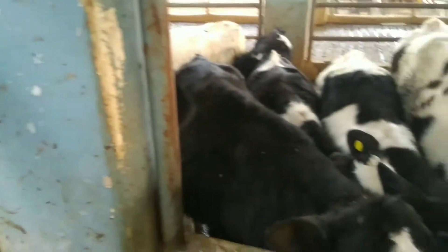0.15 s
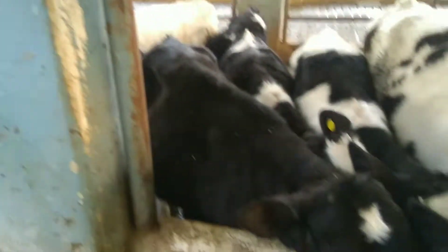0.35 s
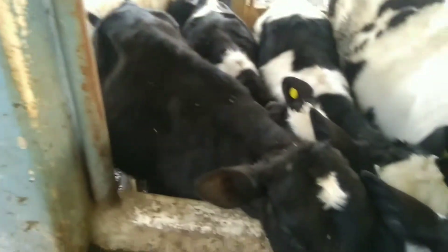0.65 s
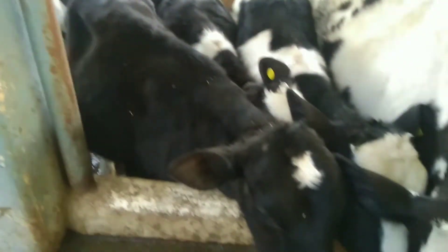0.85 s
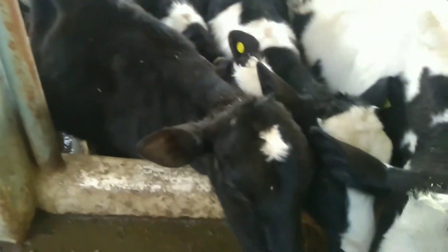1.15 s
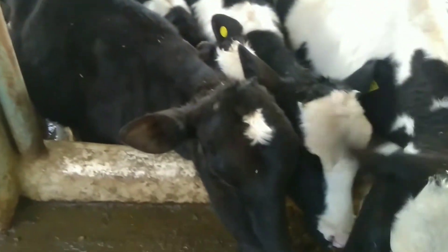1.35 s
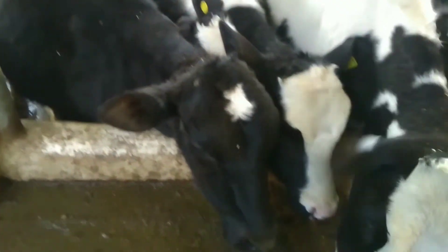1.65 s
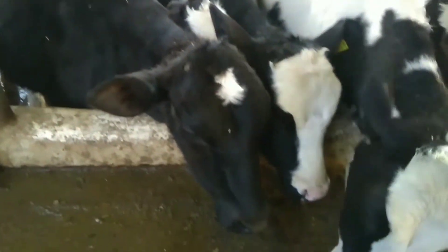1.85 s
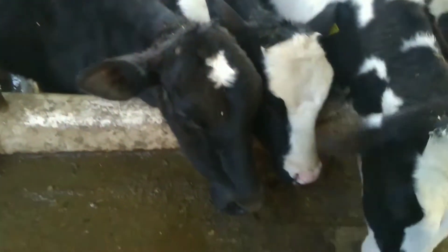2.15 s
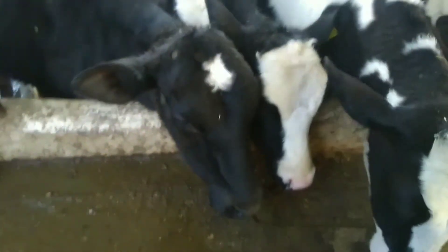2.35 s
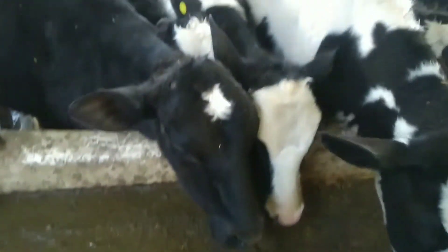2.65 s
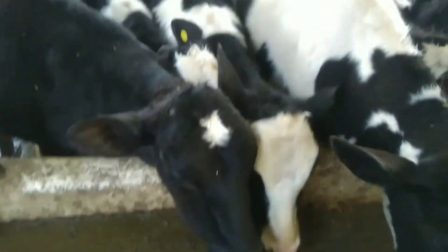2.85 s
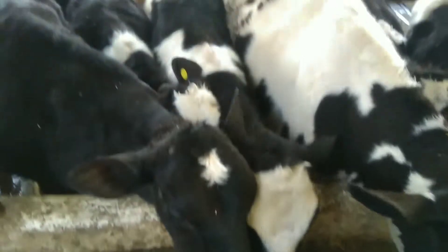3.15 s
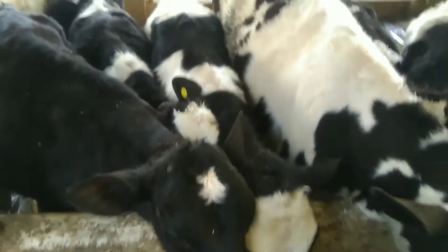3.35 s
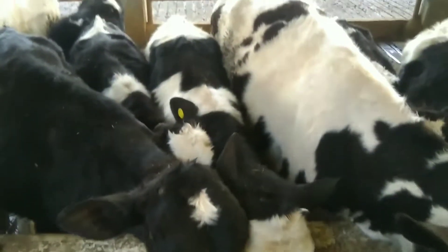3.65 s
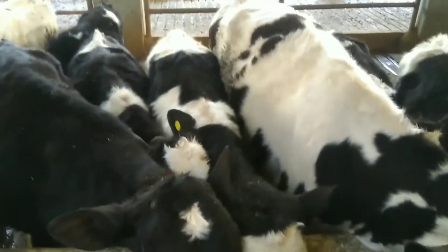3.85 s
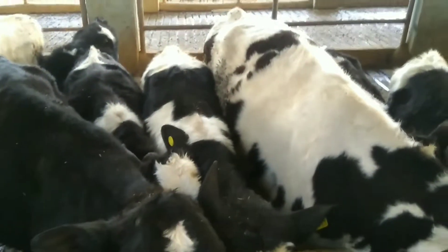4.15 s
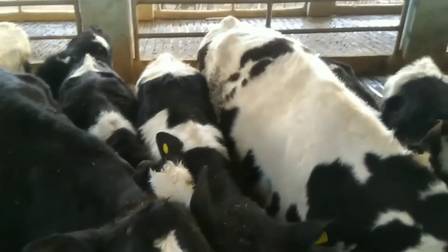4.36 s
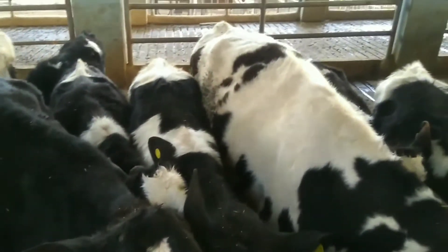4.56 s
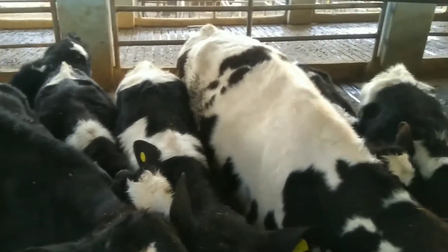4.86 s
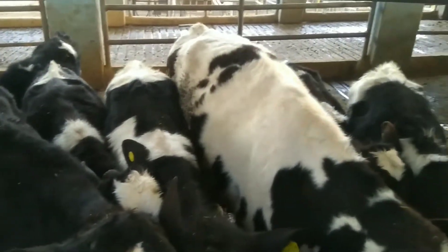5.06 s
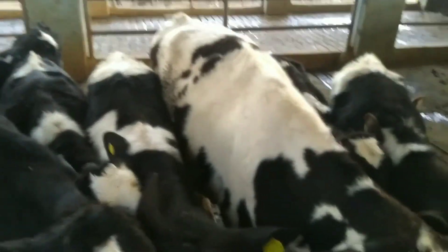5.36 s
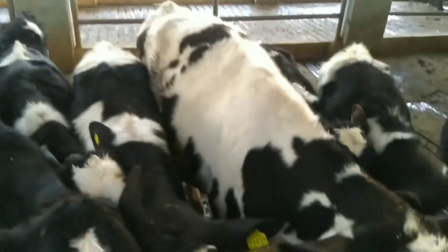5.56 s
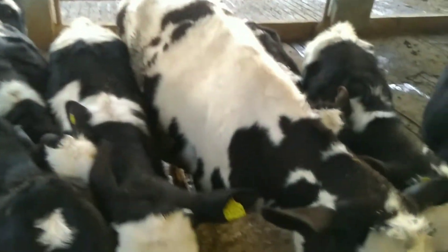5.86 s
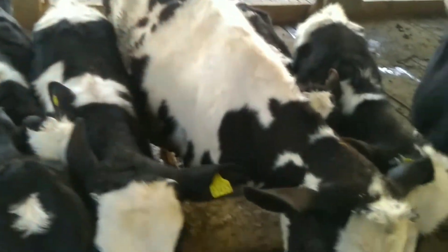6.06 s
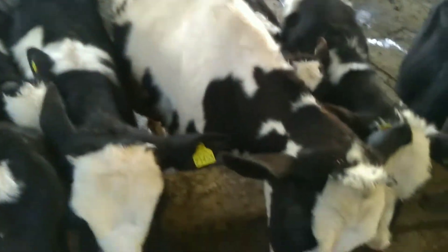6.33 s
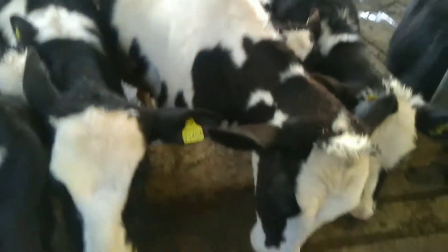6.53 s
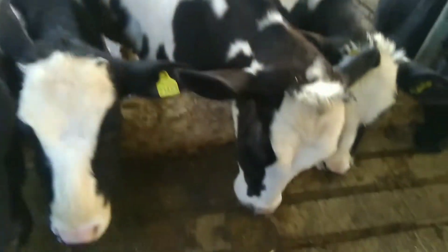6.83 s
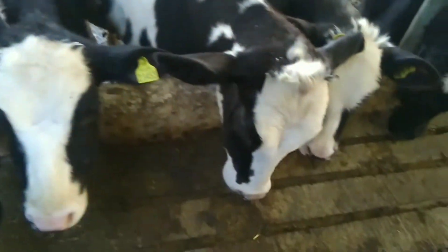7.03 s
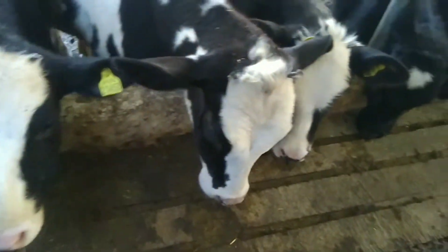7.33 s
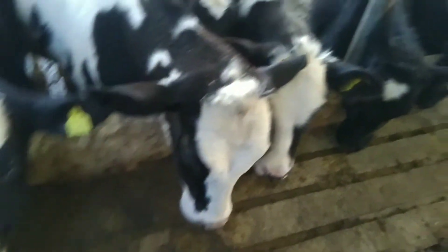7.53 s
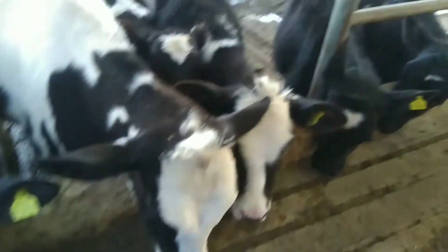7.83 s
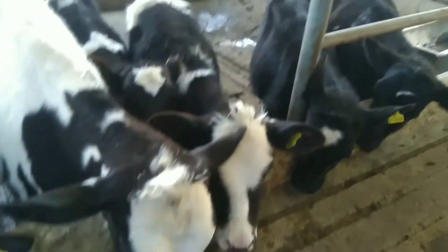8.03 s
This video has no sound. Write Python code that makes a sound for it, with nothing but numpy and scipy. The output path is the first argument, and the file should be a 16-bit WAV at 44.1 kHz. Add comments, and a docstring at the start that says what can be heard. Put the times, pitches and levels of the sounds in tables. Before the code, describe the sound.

A calf's long, loud, throaty moo rings through an echoing cattle shed, then a roof bird's repeated rising whistles and faint small-bird cheeps follow.

```python
"""Calf mooing in an echoing cattle shed

One calf moos long and loud: harmonics of its vocal folds filtered by the throat, plus pulsed breath noise.
Towards its end a bird in the roof starts repeating a rising whistle, a gliding hoarse tone; later small birds
cheep in short glides around a thin band of narrow noise. A motor whines faintly over a low hum, a trough is
knocked, far calves and pips sound as brief tones, and filtered noise makes rustles, shed air and rumble.
The recorder turns loud calls down, suppresses what is near the background and is mono below the treble."""
import sys
import numpy as np
from scipy import signal
from scipy.fft import rfft, irfft, next_fast_len
from scipy.io import wavfile
from scipy.ndimage import uniform_filter1d

SR = 44100
rng = np.random.default_rng(int(sys.argv[2]) if len(sys.argv) > 2 else 0)


def generate_wav(signal):
    """Clip the signal to [-1, 1] and save it as 16-bit WAV at the path in sys.argv[1]."""
    frames = np.transpose(np.atleast_2d(signal))
    scaled = np.clip(frames, -1, 1) * 32767
    pcm = np.round(scaled).astype(np.int16)
    wavfile.write(sys.argv[1], SR, pcm)


N = 361179
LEAD = SR   # samples of run-in, so that the shed is already ringing at 0 s
TIME = (np.arange(N + LEAD) - LEAD) / SR
# All source levels below hold ahead of the shed, where a source passes through it, and of the recorder.


def from_db(db):
    """Decibel law: 20 dB is a factor of ten in amplitude."""
    return 10 ** (np.asarray(db) / 20)


def rms_one(x):
    """Normalization to unit effective value."""
    return x / np.sqrt(np.mean(x ** 2) + 1e-20)


def in_time(rows):
    """Linear interpolation of each column of a table along the time axis."""
    s, *columns = np.transpose(rows)
    return [np.interp(TIME, s, c) for c in columns]


def at_hz(points, hz):
    """Interpolation of a spectrum on a logarithmic frequency axis."""
    point_hz, values = np.array(points).T
    return np.interp(np.log(np.maximum(hz, 1)), np.log(point_hz), values)


def drift(rate):
    """Slow random fluctuation: noise through a double one-pole low-pass at rate [Hz], rms 1."""
    r = np.exp(-2 * np.pi * rate / SR)
    return rms_one(signal.lfilter([1], [1, -2 * r, r * r], rng.standard_normal(len(TIME))))


def coloured(spectrum):
    """Spectral shaping: white noise weighted by the given spectrum, rms 1."""
    size = next_fast_len(len(TIME))
    hz = np.arange(size // 2 + 1) * SR / size
    shaped = rfft(rng.standard_normal(size)) * from_db(at_hz(spectrum, hz))
    return rms_one(irfft(shaped, size)[:len(TIME)])


def glides(rows, bend, edge):
    """Frequency modulation: sine glides, fastest at the start if bend < 1; edge is the share spent fading."""
    out = np.zeros(len(TIME))
    for s, length, from_hz, to_hz, level_db in rows:
        i = LEAD + round(s * SR)
        share = np.linspace(0, 1, round(length * SR))
        pitch = from_hz + (to_hz - from_hz) * share ** bend
        tone = np.sin(2 * np.pi * np.cumsum(pitch) / SR)
        tone *= np.sqrt(2) * from_db(level_db) * signal.windows.tukey(len(share), np.clip(edge, 0, 1))
        out[i:i + len(tone)] += tone[:max(len(out) - i, 0)]
    return out


# Reverberation time of the shed: (frequency [Hz], decay time by 60 dB [s])
SHED_DECAY = [(200, 1), (400, 1.264), (600, 1.3), (900, 1.2), (1300, 1), (2000, 1.28), (2700, 1.1),
              (3500, 2.2), (5000, 0.52), (8000, 0.95)]


def shed(x, direct_db, wet_db, dull_db=0):
    """Diffuse reverberation: half-octave noise bands decay exponentially, losing dull_db/octave above 1 kHz."""
    t, tail = np.arange(2 * SR) / SR, 0
    for low in 90 * 2. ** np.arange(0, 7.6, .5):
        edges = [low, min(np.sqrt(2) * low, .45 * SR)]
        band = signal.butter(2, edges, "band", fs=SR, output="sos")
        loss_db = dull_db * max(np.log2(low / 1000), 0)
        decay = from_db(-60 * t / at_hz(SHED_DECAY, 1.08 * low) - loss_db)
        tail = tail + signal.sosfilt(band, rng.standard_normal(len(t))) * decay
    tail *= np.clip((t - .008) / 0.017, 0, 1)   # the first walls answer after a few metres
    tail *= from_db(wet_db) / np.sqrt(np.sum(tail ** 2))
    tail[0] += from_db(direct_db)
    return signal.fftconvolve(x, tail)[:len(x)]


# Spectrum of the steady shed noise: (frequency [Hz], relative density [dB per Hz])
AIR_SPECTRUM = [(90, -41.5), (150, -18), (200, -8), (340, -9.5), (580, -8.5), (820, -14), (1310, -9),
                (2400, -15), (3800, -13), (4500, -24.5), (5000, -22), (5600, -31), (9000, -35),
                (15500, -42.5)]
AIR_DB = -55.5


def shed_air():
    """Stationary broadband noise: a fixed spectrum whose level fluctuates only slightly."""
    return from_db(AIR_DB + .6 * drift(2.3)) * coloured(AIR_SPECTRUM)


HUM_HZ, HUM_DB = 191, -71


def hum():
    """Joint frequency and amplitude modulation: a low tone wavers slowly in pitch and level."""
    phase = 2 * np.pi * np.cumsum(HUM_HZ + 7 * drift(3.6)) / SR
    return np.sqrt(2) * from_db(HUM_DB + 1.9 * drift(5)) * np.sin(phase)


# Slow level of the air rumble: (time [s], level [dB])
RUMBLE_LEVEL = [(0, -32), (.7, -39.5), (1.2, -38.5), (2.0, -32), (2.3, -44.5), (2.5, -64), (3.1, -60),
                (3.9, -51.5), (4.8, -59), (5.8, -64.5), (7.5, -66), (8.19, -47)]
# Spectrum of the rumble and its puffs: (frequency [Hz], relative density [dB per Hz])
RUMBLE_SPECTRUM = [(12, -52.5), (20, -27.5), (32, -24.5), (59, -3.5), (82, 5), (140, -14.5), (195, -10.5),
                   (300, -38.5), (390, -68), (660, -120)]
# Puffs of air on the microphone: (end of the rise [s], nominal peak level [dB])
AIR_PUFFS = [(2.438, -40), (3.198, -41), (3.407, -40), (3.623, -33.5), (3.79, -49), (3.957, -42),
             (4.208, -75), (4.453, -33.5), (4.622, -53), (4.762, -46), (5.089, -39), (5.38, -33.5),
             (5.985, -43), (6.158, -35), (6.292, -53.5), (6.72, -40), (7.65, -40.5), (7.837, -38)]
PUFF_RISE_S, PUFF_T60_S = 0.016, 0.79
PUFF_CREST_DB = 12.5   # nominal peak above rms


def rumble():
    """Turbulent pressure at the microphone: low noise on a slow level, with fast-rising, decaying puffs."""
    level = from_db(in_time(RUMBLE_LEVEL)[0] + 1.4 * drift(5))
    for s, peak_db in AIR_PUFFS:
        after = np.maximum(TIME - s + PUFF_RISE_S, 0)
        decay = from_db(peak_db - PUFF_CREST_DB - 60 * after / PUFF_T60_S)
        level = level + decay * np.clip(after / PUFF_RISE_S, 0, 1)
    return level * coloured(RUMBLE_SPECTRUM)


# Clearest rustles of hide and straw:
# (time [s], length [s], centre frequency [Hz], width [octaves], rms level before the fade window [dB])
CLEAR_RUSTLES = [(2.798, 0.14, 5840, 0.92, -65), (3.118, .08, 10430, 1.3, -57.5),
                 (4.88, 0.034, 6890, 0.75, -63.5), (5.029, .12, 9910, .92, -62.5),
                 (5.648, .092, 8480, 0.26, -62), (6.36, 0.04, 8420, .18, -67.5),
                 (6.634, .17, 7750, .68, -65), (7.832, .12, 9960, 0.36, -60.5),
                 (8.036, .033, 6496, 0.55, -62.5)]
FAINT_RUSTLES_PER_S, FAINT_RUSTLE_DB = 4, -76   # mean rate and typical level of random small ones


def rustles():
    """Friction noise: short bursts of grainy noise pass through a band filter."""
    out = np.zeros(len(TIME))
    starts = MOO_END_S + np.cumsum(rng.exponential(1, 40)) / FAINT_RUSTLES_PER_S
    draw = rng.standard_normal((40, 3))
    small = [(s, 0.11 * np.exp(.4 * a), 8000 * np.exp(0.19 * b), .6, FAINT_RUSTLE_DB + 2.5 * c)
             for s, (a, b, c) in zip(starts, draw) if s < N / SR - .2]
    for s, length, hz, width, level_db in list(CLEAR_RUSTLES) + small:
        i, size = LEAD + round(s * SR), min(round(length * SR), SR // 5)
        edges = [hz / 2 ** (width / 2), min(hz * 2 ** (width / 2), .45 * SR)]
        band = signal.butter(2, edges, "band", fs=SR, output="sos")
        grains = rng.standard_normal(8820) * from_db(2.5 * rng.standard_normal(8820))
        burst = rms_one(signal.sosfilt(band, grains[:size]))
        out[i:i + size] += from_db(level_db) * burst * np.hanning(size)
    return out


# Blows on the trough: (time [s], reference level [dB])
KNOCK_TIMES = [(6.206, -32.5)]
# Its modes: (frequency [Hz], level against the reference, before decay [dB], decay time by 60 dB [s])
TROUGH_MODES = [(620, -8.5, 0.035), (855, -2.5, 0.0553), (1167, -5.5, 0.025)]


def knock():
    """Modal vibration: a dull blow excites damped resonances of the trough."""
    t, out = np.arange(SR // 5) / SR, np.zeros(len(TIME))
    onset = np.clip(t / 0.0038, 0, 1)
    for s, peak_db in KNOCK_TIMES:
        i = LEAD + round(s * SR)
        for hz, level_db, t60 in TROUGH_MODES:
            decay = from_db(peak_db + level_db - 60 * t / t60)
            out[i:i + len(t)] += decay * np.sin(2 * np.pi * hz * t) * onset
    return out


# Strongest partials of calves far away or humming with closed mouth:
# (time [s], length [s], start pitch [Hz], level [dB])
FAR_PARTIALS = [(2.72, 0.2, 655, -50), (2.74, 0.28, 575, -50), (2.71, .07, 510, -55), (2.84, .09, 850, -60),
                (3.09, .09, 460, -62), (3.17, .08, 660, -60), (3.7, .18, 580, -60), (3.58, 0.33, 680, -58),
                (3.56, 0.14, 430, -58), (4.529, 0.07, 655, -55), (4.797, .05, 652, -57.5),
                (4.853, 0.2, 574, -50.5), (4.992, 0.102, 602, -52.5), (4.951, 0.18, 474, -42.5),
                (5.125, 0.1, 463, -50.5), (8.058, 0.29, 101.56, -38.5), (8.075, 0.17, 205, -62)]
FAR_SAG_PER_S = .17   # share of the pitch lost per second of length


def far_calves():
    """Proportional glide: every partial sags by the same share of its pitch per second of length."""
    rows = [(s, length, hz, hz * (1 - FAR_SAG_PER_S * length), level_db)
            for s, length, hz, level_db in FAR_PARTIALS]
    return glides(rows, bend=.71, edge=.45)


# Clearest short faint tones: (time [s], length [s], pitch [Hz], level [dB])
CLEAR_PIPS = [(2.545, 0.17, 1493, -46), (2.801, 0.1, 1653, -50.5), (2.845, .07, 1954, -58),
              (2.912, 0.1, 1315, -49.5), (3.002, 0.2, 1448, -54.5), (3.23, .14, 1481, -53.5),
              (3.98, .05, 910, -61.5), (5.8, .1, 3905, -71), (5.789, .05, 3555, -66),
              (5.994, 0.083, 3718, -67.5), (6.198, .045, 5220, -72.5), (6.275, 0.071, 4196, -70),
              (6.506, .06, 3960, -69.5), (7.282, .07, 4297, -75.5), (7.48, .3, 3690, -68),
              (7.68, .09, 5160, -76.5), (8.077, 0.07, 5057, -71), (3.32, .08, 4567, -54),
              (3.395, 0.14, 5023, -54.5), (3.446, 0.22, 5155, -62.5), (3.585, .2, 4970, -61.5),
              (2.465, 0.035, 5470, -64.5), (3.169, 0.12, 5090, -78.5), (3.955, .1, 5130, -69),
              (5.347, 0.11, 5113, -67), (4.035, .23, 4042, -55.5), (4.091, .07, 1362, -57),
              (4.757, 0.1, 1675, -53.5), (5.982, 0.056, 1236, -65.5), (6.623, 0.036, 1470, -57),
              (6.639, .074, 3930, -66.5), (6.738, 0.12, 5040, -68), (7.277, 0.053, 1660, -64),
              (7.238, 0.13, 5005, -75.5), (7.469, 0.16, 5027, -73.5), (7.496, .13, 5150, -71.5),
              (6.49, 0.05, 5100, -65.5), (7.46, 0.057, 1537, -56.5), (7.693, 0.15, 5920, -66),
              (7.851, 0.078, 2080, -62.5), (7.908, 0.067, 1447, -57.5), (8.075, 0.15, 3420, -52.5)]
PIP_BEND = 0.0069   # typical share of its pitch by which a clear pip departs at either end
PIP_FLUTTER_HZ = 70   # rate of the level flutter, which smears the pitch
# fainter ones come at random, near two pitches
FAINT_PIPS_PER_S, FAINT_PIP_HZ, FAINT_PIP_DB, FAINT_PIP_S = 1, (4100, 5150), -80, .07


def pips():
    """Sideband broadening: short sliding tones, tabled or by chance, are smeared by fast level flutter."""
    slides = PIP_BEND * rng.standard_normal(len(CLEAR_PIPS))
    rows = [(s, length, hz * (1 - slide), hz * (1 + slide), level_db)
            for (s, length, hz, level_db), slide in zip(CLEAR_PIPS, slides)]
    starts = MOO_END_S + np.cumsum(rng.exponential(1, 60)) / FAINT_PIPS_PER_S
    draw = rng.standard_normal((60, 3))
    for k, s in enumerate(starts[starts < N / SR]):
        hz = FAINT_PIP_HZ[k % 2] * (1 + 0.042 * draw[k, 0])
        length = FAINT_PIP_S * np.exp(0.13 * draw[k, 1])
        rows.append((s, length, hz, .99 * hz, FAINT_PIP_DB + 3 * draw[k, 2]))
    return glides(rows, bend=0.52, edge=0.47) * (1 + .6 * drift(PIP_FLUTTER_HZ))


# Level of the thin whistling band: (time [s], level [dB])
THIN_LEVEL = [(5.2, -93.5), (5.6, -61), (6.05, -55.5), (6.25, -61), (6.63, -52.5), (6.75, -59.5),
              (6.9, -51.5), (7.2, -65.5), (8.19, -62)]
THIN_HZ, THIN_WIDTH_HZ, THIN_WANDER_HZ = 3283, 90, 35   # centre, width, rms slow wandering of the pitch


def thin_band():
    """Quadrature modulation: slow noise on a wandering tone spreads it into a faint fluttering band."""
    phase = 2 * np.pi * np.cumsum(THIN_HZ + THIN_WANDER_HZ * drift(1.4)) / SR
    lowpass = signal.butter(4, THIN_WIDTH_HZ / 2, fs=SR, output="sos")
    smear = signal.sosfilt(lowpass, rng.standard_normal((2, len(TIME))))
    band = smear[0] * np.sin(phase) + smear[1] * np.cos(phase)
    return from_db(in_time(THIN_LEVEL)[0]) * rms_one(band)


# Swells of the low tone of the motor: (middle [s], length [s], level at the peak [dB])
WHINE_SWELLS = [(2.522, 0.59, -49.5), (3.123, 0.66, -48), (3.646, 0.34, -46), (4.031, 0.28, -60),
                (4.292, .22, -55), (4.538, 0.15, -56), (4.832, 0.12, -58), (5.042, .2, -59.5),
                (5.278, 0.11, -53)]
WHINE_HZ = 1820
OCTAVE_DB, OCTAVE_SWELL_DB = -52.5, 4   # mean level and swing either way
OCTAVE_EVERY_S, OCTAVE_LATE_S = .345, 0.33   # pulse period, first aligned peak after the first whistle starts
OCTAVE_SPAN_S = (1.5, 5.5)


def whine():
    """Harmonic motor tone: an unsteady fundamental in swells, its octave pulsing about once a whistle."""
    low = 0
    for s, length, peak_db in WHINE_SWELLS:
        low = low + from_db(peak_db) * np.cos(np.pi * np.clip((TIME - s) / length, -.5, .5))
    beat = np.cos(2 * np.pi * (TIME - RISING_WHISTLES[0][0] - OCTAVE_LATE_S) / OCTAVE_EVERY_S)
    sounding = (TIME > OCTAVE_SPAN_S[0]) * (TIME < OCTAVE_SPAN_S[1])
    high = from_db(OCTAVE_DB + OCTAVE_SWELL_DB * beat) * sounding
    phase = 2 * np.pi * np.cumsum(WHINE_HZ + 16 * drift(20)) / SR
    return np.sqrt(2) * (low * np.sin(phase) + high * np.sin(2 * phase))


# Course of the small birds: (time [s], centre pitch [Hz], reference level of the cheeps [dB])
FLOCK_COURSE = [(6.8, 3190, -75), (6.9, 3120, -41), (6.96, 3130, -53.5), (7.15, 3375, -54),
                (7.28, 3120, -53), (7.4, 3330, -53.5), (7.53, 3284, -52), (7.78, 3300, -50.5),
                (8.19, 3330, -55)]
LOW_START_DB = -9.5   # cheeps that start lower, against the reference level


def flock(per_s=60, spread_hz=90):
    """Random superposition: many short rising cheeps; every third starts lower and glides further."""
    centre, level_db = in_time(FLOCK_COURSE)
    draw = rng.standard_normal((400, 2))
    starts = FLOCK_COURSE[0][0] + np.cumsum(rng.exponential(1, 400)) / per_s
    rows = []
    for k, s in enumerate(starts[starts < N / SR - .01]):
        i = LEAD + round(s * SR)
        hz = centre[i] + spread_hz * np.clip(draw[k, 0], -1.5, 1.5)
        chance_db = 4 * draw[k, 1]
        if k % 3:
            rows.append((s, .04, hz - 60, hz + 60, level_db[i] - 4 + chance_db))
        else:
            rows.append((s, .06, hz - 130, hz + 180, level_db[i] + LOW_START_DB + chance_db))
    return glides(rows, bend=0.94, edge=0.49)


# Rising whistles of the roof bird: (time [s], start pitch [Hz], level before roughening and filters [dB])
RISING_WHISTLES = [(1.84, 2068, -41.5), (2.185, 2027, -42), (2.539, 2117, -40.5), (2.875, 2045, -40.5),
                   (3.225, 2164, -39.5), (3.564, 2051, -40), (3.903, 2096, -42), (4.262, 2127, -40.5),
                   (4.6, 2120, -41), (4.939, 2114, -41), (5.289, 2097, -43)]
WHISTLE_S, WHISTLE_TO_HZ, WHISTLE_WEAK_BELOW_HZ = .25, 3950, 2200


def whistles():
    """Filtered glide: noise modulation makes a rising tone breathy, and filters weaken its two ends."""
    rows = [(s, WHISTLE_S, hz, WHISTLE_TO_HZ, level_db) for s, hz, level_db in RISING_WHISTLES]
    hoarse = glides(rows, bend=.95, edge=.22) * (.7 + .6 * drift(120)) * from_db(1.8 * drift(30))
    hoarse = signal.sosfilt(signal.butter(4, WHISTLE_WEAK_BELOW_HZ, "high", fs=SR, output="sos"), hoarse)
    # a gentle low-pass favours the early, lower part
    hoarse = 1.9 * signal.sosfilt(signal.butter(1, 1800, fs=SR, output="sos"), hoarse)
    return signal.sosfilt(signal.cheby2(6, 14, 3800, fs=SR, output="sos"), hoarse)


# Throat resonances of the moo, already under way at 0 s:
# (time [s], then the level of each of four resonance groups from low to high [dB])
MOO_LEVELS = [(-.4, -48, -54.5, -45.5, -61), (-.15, -25, -37, -23, -29), (0.0, -20, -24, -18.5, -23.5),
              (0.04, -21.5, -28, -20.5, -28.5), (0.36, -24.5, -19, -17.5, -22),
              (0.38, -33.5, -19, -15.5, -25), (0.47, -15, -26, -15, -24), (0.54, -16, -26.5, -26.5, -34),
              (0.63, -20.5, -25, -14, -22), (0.66, -21.5, -19, -20, -25), (0.7, -14, -24, -22, -28),
              (0.76, -17, -20.5, -18, -25.5), (0.86, -14, -22, -21, -26.5), (1.06, -19, -19, -16, -24.5),
              (1.25, -14, -26, -19.5, -26.5), (1.33, -24, -20.5, -12.5, -24), (1.58, -19, -20, -18, -28.5),
              (1.63, -22.5, -19.5, -17.5, -27.5), (1.85, -21, -29, -22.5, -29.5),
              (2.0, -24.5, -26.5, -29.5, -35.5), (2.1, -27, -34, -35, -40.5)]
# Rate of the vocal folds, smoothed over 50 ms when played: (time [s], pitch [Hz])
FOLD_PITCH = [(-.4, 92), (-.15, 103.5), (0, 111), (.17, 119), (.32, 124.8), (.41, 128.1), (.51, 131.4),
              (.61, 134.9), (.7, 137.6), (.8, 138.9), (.91, 139.3), (1.06, 138.8), (1.24, 137.4),
              (1.4, 135.5), (1.54, 132.3), (1.63, 128.6), (1.77, 120.6), (1.87, 112.5), (2.0, 97),
              (2.1, 86)]
# Unevenness of the folds: (time [s], roughness [0-1], strong-weak alternation of pulses [0-1])
FOLD_ROUGHNESS = [(0, .03, 0), (.6, .02, 0), (.65, .3, .3), (.69, .015, 0), (1.3, .02, 0), (1.5, .04, .05),
                  (1.6, .2, .35), (1.9, .3, .3), (2.1, .6, .3)]
# Mouth: (time [s], resonances as a share of their tabled pitch [1], sharpness of the resonances [1])
MOUTH_SHAPE = [(-.4, 0.69, 0.8), (0, 1, 0.86), (.3, 1.0, 0.79), (.6, 0.98, 1.0), (1.2, 1.002, 1.0),
               (1.6, 1.062, 0.69), (1.85, .99, 1), (2.1, 0.88, 0.62)]
# Throat filter: (frequency [Hz], gain at full sharpness [dB])
THROAT_FILTER = [(140, -36), (270, -5.5), (410, 7.5), (560, -8.5), (720, -18), (840, -12), (970, 7),
                 (1200, -16), (1520, -1.5), (1680, -6), (1830, -1.5), (2150, -14.5), (2400, -6),
                 (2800, -17.5), (3050, -19), (3300, -19.5), (3500, -23.5), (3630, -12), (3780, -29.5),
                 (3950, -34.5), (4150, -25.5), (4400, -48.5), (4600, -30.5), (4900, -50.5), (6500, -45)]
# Spectrum of the breath noise: (frequency [Hz], relative density [dB per Hz])
BREATH_SPECTRUM = [(300, -20), (900, -9), (1600, -3.5), (2500, -10.5), (3600, -20.5), (4300, -13.5),
                   (5000, -17), (6200, -16.5), (8200, -24), (8800, -30.5), (11000, -30.5), (12500, -37.5),
                   (14000, -31.5), (15500, -34)]
# Valleys between the four resonance groups: (frequency [Hz])
GROUP_EDGES_HZ = [720, 1220, 2170]
STILL_ABOVE_HZ = 3400   # resonances up here stay put while the mouth moves
MOO_END_S, BREATH_END_S = 2.003, 2.146   # the breath outlasts the voice
BREATH_DB = -15   # against the level of the highest resonance group
SPREAD_RAD = .22   # the throat rings on: phase lag per square root of harmonic number
WAVER_DB = .17   # level waver per harmonic number, up to the 20th


def moo():
    """Source-filter principle: fold harmonics are weighted by the throat, with breath puffed once a cycle."""
    levels_db = in_time(MOO_LEVELS)
    pitch = uniform_filter1d(in_time(FOLD_PITCH)[0], size=SR // 20)
    rough, uneven = in_time(FOLD_ROUGHNESS)
    mouth, sharp = in_time(MOUTH_SHAPE)
    # uneven folds shake the pitch
    phase = 2 * np.pi * np.cumsum(pitch * (1 + .03 * rough * drift(40))) / SR
    used = TIME < MOO_END_S
    groups = np.zeros((4, used.sum()))
    wavers = [drift(3)[used] for _ in range(9)]   # shared in turn by the harmonics
    lags = SPREAD_RAD * rng.standard_normal(52)
    at = np.arange(used.sum())
    for k in range(1, 52):
        hz = k * pitch[used]
        throat_hz = np.where(hz < STILL_ABOVE_HZ, hz / mouth[used], hz)
        gain_db = sharp[used] * at_hz(THROAT_FILTER, throat_hz) + WAVER_DB * min(k, 20) * wavers[k % 9]
        lag = np.sqrt(k) * (lags[k] + .12 * wavers[(k + 5) % 9])
        harmonic = from_db(gain_db) * np.cos(k * phase[used] + lag)
        groups[np.searchsorted(GROUP_EDGES_HZ, hz), at] += harmonic
    # each group is brought to an even level before the table sets its strength
    groups /= np.sqrt(uniform_filter1d(groups ** 2, size=4500, axis=1) + 1e-9)
    voice = np.zeros(len(TIME))
    voice[used] = np.sum(from_db(levels_db)[:, used] * groups, axis=0)
    voice *= from_db(5 * rough * drift(60)) * (1 + uneven * np.cos(phase / 2))
    breath = from_db(BREATH_DB + levels_db[-1]) * coloured(BREATH_SPECTRUM) * (1 + .35 * np.cos(phase))
    voice *= np.clip((MOO_END_S - TIME) / 0.067, 0, 1)
    return voice + breath * np.clip((BREATH_END_S - TIME) / .15, 0, 1)


def scene():
    """Linear superposition: direct and reverberant sources add to one pressure, given to both channels."""
    air, low_air, low_tone = shed_air(), rumble(), hum()
    far = shed(far_calves() * (1 + .7 * drift(60)), direct_db=-2, wet_db=-14)
    faint = shed((pips() + whine()) * (1 + 0.3 * drift(30)), direct_db=-0.5, wet_db=-9)
    birds = shed(whistles() + flock(per_s=70, spread_hz=110), direct_db=-6, wet_db=-.5)
    calf = shed(moo(), direct_db=8.0, wet_db=-2.5, dull_db=2.5)
    mono = air + low_air + low_tone + rustles() + knock() + far + faint + thin_band() + birds + calf
    return np.array([mono, mono])[:, LEAD:]


def gain_control(x, knee_db=-26, share=0.43, release_db_s=45):
    """Dynamic compression: a share of the excess is removed; steady release then lifts the shed's tail."""
    level_db = 10 * np.log10(uniform_filter1d(x ** 2, size=1500) + 1e-12)
    ramp = release_db_s * np.arange(N) / SR
    held_db = np.maximum.accumulate(level_db + ramp) - ramp   # peaks held, falling at the release rate
    excess_db = uniform_filter1d(np.maximum(held_db - knee_db, 0), size=1500)
    return x * from_db(-share * excess_db)


def suppress(x, margin_db=5, depth_db=-10, memory_db=-15):
    """Spectral subtraction: cells near the background or far under recent loudness are turned down."""
    cells = signal.stft(x, nperseg=1024, noverlap=768)[2]
    power = uniform_filter1d(np.abs(cells) ** 2, size=3, axis=0)
    power = signal.lfilter([.3], [1, -.7], power, axis=1)
    background = signal.medfilt(np.percentile(power, 25, axis=1), kernel_size=61)[:, None]
    past = signal.lfilter([.016], [1, -.984], uniform_filter1d(power, size=25, axis=0), axis=1)
    floor = from_db(2 * margin_db) * background + from_db(2 * memory_db) * past
    gain = 1 - floor ** 1.537 / (power + 1e-20) ** 1.48
    gain[:4] = 1   # the lowest bands pass untouched
    return signal.istft(cells * np.maximum(gain, from_db(depth_db)), nperseg=1024, noverlap=768)[1][:N]


SIDE_FROM_HZ, SIDE_DB, CUTOFF_HZ = 3290, -3, 15800


def record(dry):
    """Mid-side decorrelation: after level control and soft clipping, only the treble differs by side."""
    mid = suppress(gain_control(dry.mean(axis=0)))
    mid = mid / (1 + (mid / .95) ** 4) ** .25   # rounded peaks
    scatter = rng.standard_normal(6000) * np.exp(-np.arange(6000) / 1500)
    side = signal.fftconvolve(mid, scatter / np.sqrt(np.sum(scatter ** 2)))[:N]
    treble = signal.cheby2(12, 90, SIDE_FROM_HZ, "high", fs=SR, output="sos")
    side = from_db(SIDE_DB) * signal.sosfilt(treble, side)
    top_cut = signal.cheby2(22, 70, CUTOFF_HZ, fs=SR, output="sos")
    return signal.sosfilt(top_cut, [mid + side, mid - side])


dry = scene()
out = record(dry)
generate_wav(out)
```